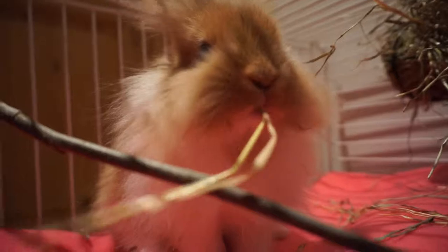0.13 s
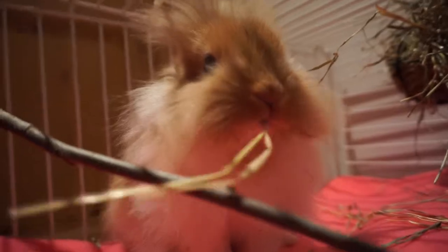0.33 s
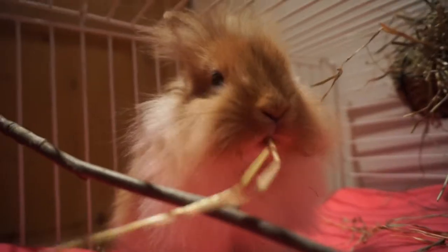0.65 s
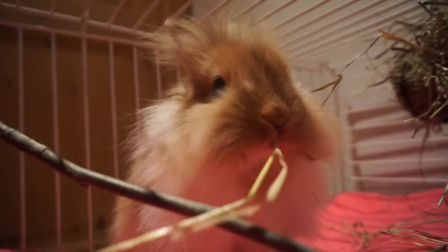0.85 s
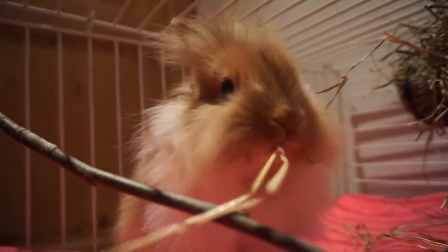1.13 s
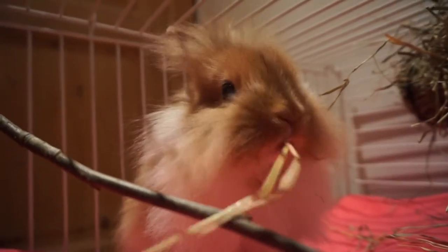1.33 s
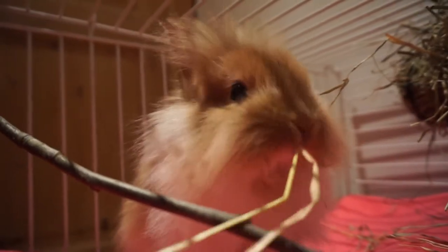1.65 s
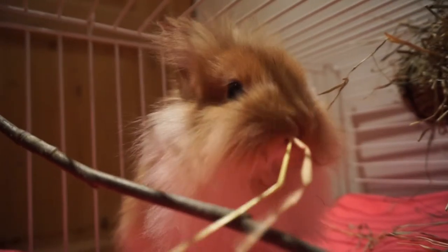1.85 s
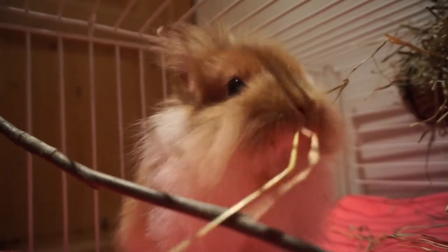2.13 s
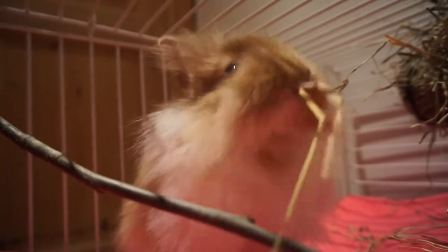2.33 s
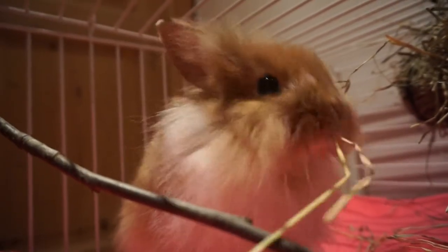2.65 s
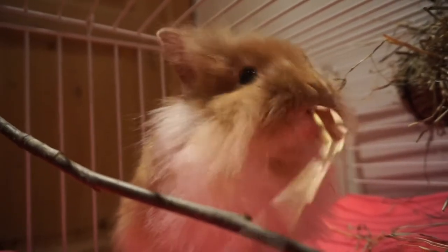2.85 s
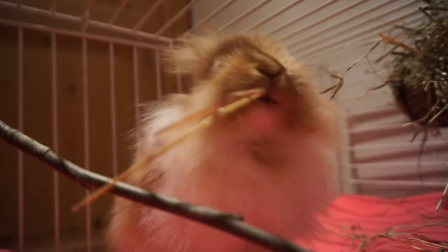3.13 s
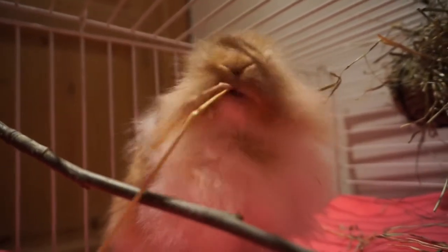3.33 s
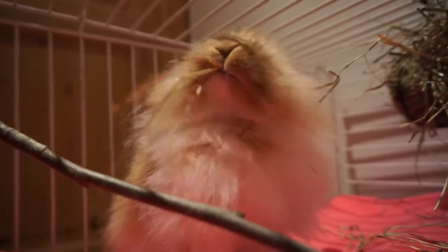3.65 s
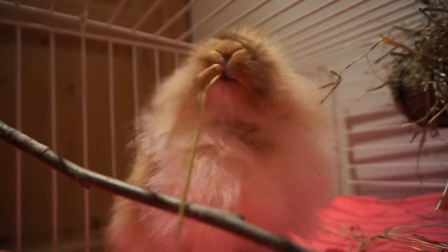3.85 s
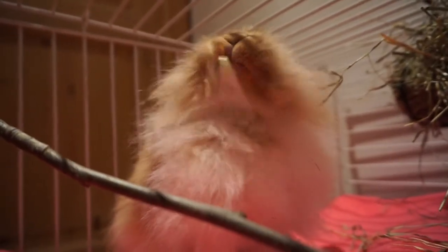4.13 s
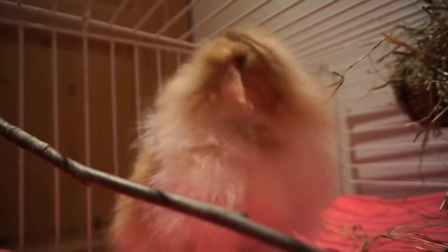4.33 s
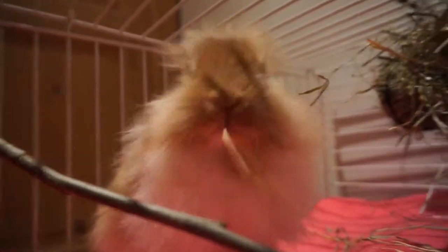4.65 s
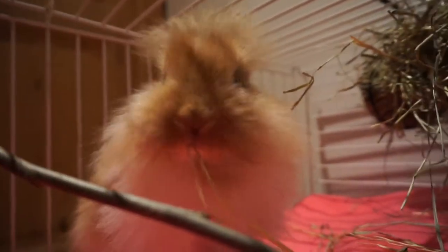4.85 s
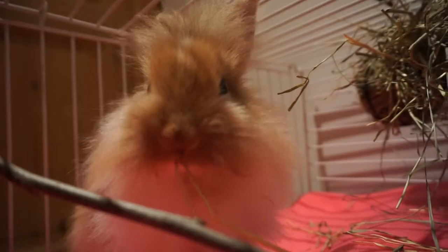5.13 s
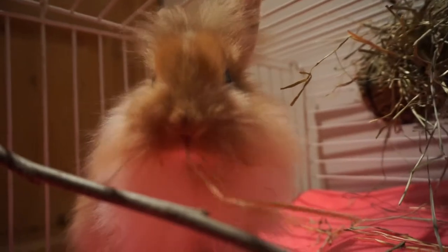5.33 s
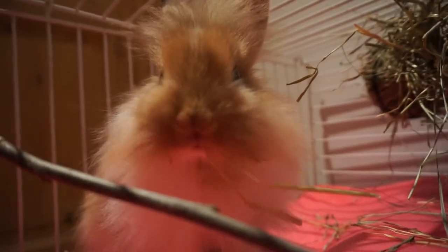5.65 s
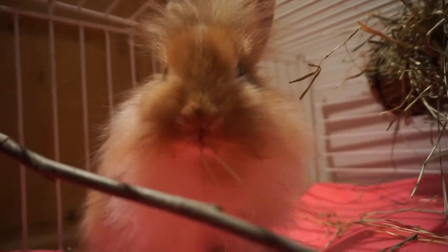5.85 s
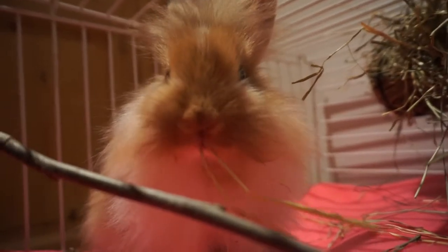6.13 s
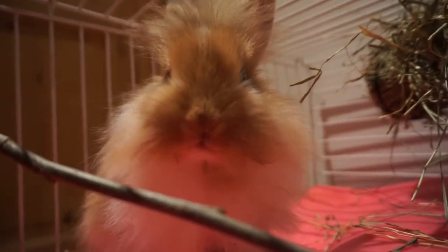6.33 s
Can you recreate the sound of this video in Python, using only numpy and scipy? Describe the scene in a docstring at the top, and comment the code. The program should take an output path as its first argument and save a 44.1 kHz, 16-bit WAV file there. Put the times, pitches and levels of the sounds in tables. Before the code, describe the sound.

A rabbit chews dry hay close by, with quick, crisp snaps and crunches over soft low thumps and faint room hiss.

```python
"""A small rabbit eating a dry stalk of hay in its cage, close to a hand-held stereo microphone.
Single fibres snap between its teeth, bundles tear in short crunches, each bite leaves crumbs ticking,
and the cage throws the cracks back. The stalk creaks as it is pulled in. Soft low thumps and scuffs
come about three times a second, then thin out. Behind it lies faint room hiss; the sound fades in."""
import sys
import numpy as np
from scipy import signal
from scipy.fft import rfft, irfft, next_fast_len
from scipy.io import wavfile
from scipy.ndimage import uniform_filter1d

SR = 44100
rng = np.random.default_rng(int(sys.argv[2]) if len(sys.argv) > 2 else 0)


def dump_mix(stems):
    """Bounce the given channels to the path in sys.argv[1] as a 16-bit WAV at rate SR."""
    frames = np.atleast_2d(stems).T  # one column per channel
    limited = np.clip(frames, -1, 1)  # hard clip at full scale
    pcm = np.round(limited * 32767).astype(np.int16)
    wavfile.write(sys.argv[1], SR, pcm)


N = 285887
TIME = np.arange(N) / SR

# Levels are relative. Spectrum of room and microphone hiss: f/Hz, level/dB
HISS_SPECTRUM = [(15, -37), (25, -11), (107, 0.5), (126, -8), (200, -8), (222, -11.5), (425, -12),
                 (461, -13), (791, -13), (905, -14), (1180, -15), (2200, -20), (2520, -20), (10300, -25),
                 (15800, -23.5)]
# stereo image of that hiss: f/Hz, left-right correlation
ROOM_IMAGE = [(60, 1), (130, 0.84), (290, 0.13), (640, -0.25), (1400, -0.34), (3100, -0.17), (15000, -0.11)]
# stereo image close to the microphone: f/Hz, left-right correlation
CLOSE_IMAGE = [(100, 1), (250, 0.96), (600, 0.93), (2000, 0.54), (15000, 0.93)]
# puffs of faint thin whistle: peak t/s, half width/s, level/dB
WHISTLE_PUFFS = [(1.66, 0.094, -56), (2.087, 0.022, -57.5), (3.55, 0.027, -57.5), (3.92, 0.04, -60.5),
                 (5.23, 0.024, -60.5), (5.534, .025, -56), (5.75, 0.059, -61), (5.903, 0.066, -57.5)]
# how busy the rabbit is; drives rustle, steady grinding and weak snaps: t/s, level/dB
ACTIVITY = [(0, -1.5), (1.3, 1.5), (2.6, 3.5), (3, -1), (4.3, -0.5), (5.3, -2), (6.2, -9), (6.48, -1.5)]
# spectrum of a dull brush: f/Hz, level/dB
BRUSH_SPECTRUM = [(100, -15), (220, -2), (380, 1.5), (650, -8.5), (1200, -9), (2200, -16), (4000, -23),
                  (9000, -24.5), (16000, -39)]
# spectrum of a papery rasp: f/Hz, level/dB
RASP_SPECTRUM = [(200, -14), (700, -14), (1200, -16), (1450, -6), (1650, 1), (2150, -2), (2600, -0.5),
                 (2950, 2), (3400, -1.5), (4200, -9.5), (8000, -46), (16000, -36)]
# something soft rubbing: t/s, fall/s, level/dB, factor on the rasp's frequencies
SCUFF_STROKES = [(.35, 0.16, -56.5, 0.97), (0.766, 0.025, -47, 0.99), (.828, 0.049, -55, .98),
                 (.893, 0.041, -48, 0.81), (1.541, .08, -52.5, .78), (1.66, 0.025, -46, 1.2),
                 (2.19, 0.08, -45, 0.69), (2.555, 0.071, -49, 1.2), (3.42, .07, -53, 1.12),
                 (4.38, 0.031, -46.5, 0.59), (4.7, .04, -58, 1.02), (5.025, .06, -52, 0.86),
                 (5.303, 0.016, -47, 1.05), (6.37, 0.16, -57.5, 1.15)]
# padded blows: t/s, fall/s, thud level/dB, thud f/Hz, knock level/dB, brush level/dB, sway level/dB
BLOWS = [(.405, 0.048, -35, 119, -52.5, -61, -29.5), (.56, 0.063, -39, 129.4, -59, -56.5, -64),
         (.891, 0.08, -39, 126, -60, -60.5, -44), (1.21, .059, -34.5, 116.4, -61, -51, -43),
         (1.54, 0.054, -32.5, 166, -50.5, -49, -38), (1.68, .045, -43.5, 131, -61, -59, -62),
         (1.848, 0.066, -36, 115.6, -52, -46.5, -39.5), (2.19, 0.072, -35.5, 130, -46.5, -50, -36),
         (2.52, 0.062, -42, 193, -58, -54, -62), (2.58, 0.058, -37.5, 122, -44, -48.5, -60),
         (3.145, 0.042, -46, 116, -43, -55, -56), (3.734, 0.043, -48.5, 92.5, -53, -63, -60),
         (4.28, .047, -39.5, 130, -70, -74, -64), (4.87, 0.15, -48.5, 130, -60, -61, -54),
         (5.298, 0.0074, -44, 610, -66, -50.5, -65)]
# boom under the heaviest blows: t/s, rise/s, fall/s, level/dB, f/Hz
BLOW_BOOMS = [(0.412, .05, 0.14, -24, 64.7), (1.559, 0.05, 0.042, -34.5, 90),
              (2.22, 0.026, 0.036, -34.5, 80.7), (2.556, 0.032, 0.056, -26.5, 76.3),
              (2.611, 0.022, 0.036, -34, 83.5)]
# time the cage takes to die away by 60 dB: f/Hz, decay/s
CAGE_DECAY = [(300, 0.69), (2000, 0.47), (8000, 0.41), (15000, 0.027)]
# the stalk creaking: t/s, fall/s, level/dB, factor on its resonances
STALK_CREAKS = [(.42, .04, -59, 1.03), (.768, 0.031, -48, 1.02), (.832, 0.036, -50, 0.97),
                (.875, .015, -55, 0.96), (.9, 0.022, -47.5, 0.98), (3.4, .06, -55, 1.02),
                (4.71, 0.029, -55.5, 0.98)]
# resonances of the creak: f/Hz, width/Hz, level/dB
CREAK_MODES = [(1645, 80, 0.5), (2820, 170, -0.5)]
# spectrum of chewed fibres ticking: f/Hz, level/dB
TICK_SPECTRUM = [(500, -16), (2500, -5.5), (5500, -15), (10000, -6), (12500, -11), (14300, -8), (16000, -1)]
# sizzle of the stalk sliding between the teeth: t/s, level/dB
SIZZLE_LEVEL = [(0, -77), (3, -78), (3.4, -58), (3.9, -65), (4.1, -55.5), (4.6, -54), (4.75, -68),
                (5.7, -64), (6.48, -70)]
# resonances of stalk and mouth: f/Hz, width/Hz, level/dB
MOUTH_MODES = [(1800, 190, -7), (2640, 750, -0.5), (6400, 560, -11), (9300, 2100, -6)]
# snaps gain sheen as the rabbit lifts its mouth toward the microphone: t/s, level/dB near 14 kHz
SNAP_SHEEN = [(1.3, 1), (1.7, -1.5), (2.4, -0.5), (3.2, 4), (3.7, -1.5), (4.3, 1), (5.2, 1), (5.9, 6.5)]
# bundles of fibres tearing: peak t/s, half width/s, level/dB, woody part/dB
BUNDLE_TEARS = [(.508, 0.0039, -48, 0), (1.663, 0.01, -45, 0), (2.397, 0.0062, -33.5, -7.5),
                (3.134, 0.0083, -39, -3), (3.222, 0.0053, -45.5, -3), (3.358, 0.0083, -46.5, -1),
                (3.452, 0.0089, -31, -10.5), (3.503, 0.0094, -37, -5.5), (3.709, 0.0065, -37.5, -17),
                (3.737, 0.0066, -36.5, -6.5), (3.76, 0.0055, -32, -12.5), (3.98, 0.0081, -32, -11),
                (4.024, 0.0085, -40, -20), (4.087, 0.0085, -41, -29), (4.534, 0.0082, -49.5, -10),
                (5.387, .005, -50, -14), (5.564, .005, -45, -12), (5.586, 0.0055, -45, -8),
                (5.911, 0.0034, -43, -28)]
# strong fibres breaking: t/s, treble level/dB, 7 kHz part/dB, woody part/dB, left over right/dB
STRONG_SNAPS = [(0.2982, -23.5, -9, 8, -4), (0.3227, -25, -6, 1, -8), (0.509, -14, -3.5, -5, 0),
                (0.5546, -19.5, -6, 7, -6), (0.5624, -23, -3, 9.5, -1), (0.7811, -34, -12, 24, -4),
                (0.8003, -24.5, -16, 16, -7), (0.9964, -23.5, -4, 7.5, -5), (1.0003, -24.5, -2, 7.5, 5),
                (1.045, -24, 2.5, 11.5, -4), (1.177, -25, -8, 8, -6), (1.2123, -12.5, -5, -4, 1.5),
                (1.268, -29, -2, 11, -4), (1.383, -23.5, 4, -0.5, 4), (1.4077, -33, -5, 13.5, -6),
                (1.4762, -9, -17, 0, -2), (1.4816, -5.5, -7, -12.5, -2), (1.5166, -20, -1.5, -3, -3),
                (1.6424, -1.5, -0.5, -11, -1), (1.6493, -7.5, 2.5, -2.5, -5), (1.668, -27.5, -1, 14.5, -2),
                (1.6884, -12, 1.5, 7.5, -6), (1.7052, -8.5, -4, -6, 0.5), (1.8836, -21.5, 6, -3.5, 0),
                (2.119, -10, -3.5, -9, 0.5), (2.1511, -18, -19, 3.5, -3), (2.3265, 0.5, -10.5, -16.5, -2),
                (2.3304, -8.5, -7, -11, 5), (2.372, -9, -17, -12, -6), (2.3931, -11, -3, -14.5, 0),
                (2.437, -20.5, -2, -9, -6), (2.5216, -21, -4, -5, -2), (2.5552, -7, -3.5, -5.5, -2),
                (2.7607, -26.5, -4, 2, 0), (2.9058, -29, 3.5, 5.5, -9), (2.9593, -18.5, 0, -6.5, -5),
                (3.055, -29.5, -7, 9, -8), (3.1357, -14, 3, -7, -8), (3.143, -13.5, -12, -3, 2),
                (3.2131, -20.5, -5, -3, 6), (3.2684, -15.5, -6, 2, -2), (3.4545, -11.5, -3, 0, 4),
                (3.4692, -19, -6, -8, -7), (3.5668, -20, -11, -2, 2), (3.673, -21, -8, -11, 9),
                (3.6947, -2, -9, -14.5, 3), (3.957, -11.5, -4.5, -6.5, -2), (3.963, -8, -9, -29, 3),
                (4.0509, -14, -20, -29, -1), (4.1566, -23, -2, -4, -2), (4.1821, -6, -7, -9, -5),
                (4.198, -20, -5, 5, -1), (4.3378, -6.5, -5.5, -13.5, -3), (4.3917, -33, -9, 21.5, -12),
                (4.4069, -21.5, -13, 9, -6), (4.6167, -12.5, -12, -1.5, -2), (4.6302, -22, -12, 4, -3),
                (4.8437, -20.5, -1, 9.5, -1), (4.8499, -14.5, -17, 3, 1), (5.0742, -25.5, -27, 14, -4),
                (5.091, -17, -8, 6, 2), (5.1409, -11, -15, -28, 4), (5.3005, -17.5, -10, -11, -5),
                (5.354, -16.5, -7, -14, 1), (5.5627, -11, -13, -24, 3), (5.5823, -16, -4, -8, -2),
                (5.9154, -14.5, -33.5, -33, -1), (5.9443, -19, -21, -24, 4), (5.9479, -9, -20, -40, 1),
                (6.0102, -22, -13, -24, -3)]


def amp(db):
    """Decibels to gain."""
    return 10 ** (np.asarray(db) / 20)


def unit(x):
    """Scales to rms 1."""
    return x / np.sqrt(np.mean(x ** 2) + 1e-20)


def read(points, hz):
    """Joins (f/Hz, value) points on a log-frequency axis."""
    f, value = np.transpose(points)
    return np.interp(np.log(hz + 1), np.log(f + 1), value)


def curve(rows):
    """Gain over time from (t/s, level/dB) rows."""
    return amp(np.interp(TIME, *np.transpose(rows)))


def add(mix, s, sound):
    """Mixes a stereo sound in at time s."""
    part = mix[:, max(round(s * SR), 0):][:, :sound.shape[1]]
    part += sound[:, :part.shape[1]]


def colour(x, points, size=1024):
    """Causal filter with the given (f/Hz, level/dB) shape."""
    log_gain = np.log(amp(read(points, abs(np.fft.fftfreq(size, 1 / SR)))))
    taps = np.fft.ifft(np.exp(np.conj(signal.hilbert(log_gain)))).real[:size // 2]
    return signal.fftconvolve(x, taps[None], axes=1)[:, :x.shape[1]]


def resonate(x, hz, q):
    """Rings one resonance."""
    return signal.lfilter(*signal.iirpeak(hz, q, SR), x)


def noise(shape_db, size, image=CLOSE_IMAGE):
    """Stereo noise of rms 1 with the spectrum shape_db(Hz), partly alike in both channels."""
    hz = np.fft.rfftfreq(size, 1 / SR)
    left, other = rfft(rng.standard_normal((2, size)))
    same = np.clip(read(image, hz), -1, 1)
    right = same * left + np.sqrt(1 - same ** 2) * other
    return unit(irfft(np.array([left, right]) * amp(shape_db(hz)), size))


def band(centre_hz, width_hz):
    """Shape in dB of a resonance passed twice."""
    return lambda hz: -20 * np.log10(1 + ((hz - centre_hz) / width_hz) ** 2)


def swell(rise, fall, size=32768):
    """Smooth rise, then exponential fall."""
    t = TIME[:size]
    return np.sin(np.pi / 2 * np.minimum(t / rise, 1)) ** 2 * np.exp(-np.maximum(t - rise, 0) / fall)


def burst(x, envelope):
    """Noise under an envelope, holding just the envelope's energy."""
    return unit(x * envelope) * np.sqrt(np.mean(envelope ** 2))


def flutter(size, spread_db, window):
    """Gain that wanders at random, smoothed over a window of samples."""
    return amp(spread_db * unit(uniform_filter1d(rng.standard_normal(size), size=window)))


def crackle(size, per_s, spread_db, width):
    """Tiny fractures of very uneven strength; width sets how unlike the two channels are."""
    strength = amp(spread_db * np.minimum(rng.exponential(1, size), 3.5))
    breaks = rng.random(size) < per_s / SR
    return strength * breaks * (rng.choice([-1, 1], size) + width * rng.standard_normal((2, size)))


def background(hiss_db=-53, hum_db=-63, hum_hz=100, whistle_hz=990):
    """The room behind the cage: steady hiss and rumble, a low hum, puffs of faint wavering whistle."""
    size = next_fast_len(N)
    hiss = noise(lambda hz: read(HISS_SPECTRUM, hz), size, ROOM_IMAGE)[:, :N]
    hum = np.sin(2 * np.pi * hum_hz * TIME)
    whistle = noise(band(whistle_hz, width_hz=55), size)[:, :N]
    puffs = sum(amp(db - 2) / (1 + ((TIME - s) / half) ** 2) for s, half, db in WHISTLE_PUFFS)
    return amp(hiss_db) * hiss + amp(hum_db) * hum + puffs * whistle


def dull_brush(size):
    """The noise of soft rubbing, heard close."""
    return noise(lambda hz: read(BRUSH_SPECTRUM, hz), size)


def rustle(brush_db=-64, rumble_db=-58):
    """Fur and bedding shifting under the busy animal: a lumpy dull brush over a low rumble."""
    size = next_fast_len(N)
    lumps = flutter(N, spread_db=3, window=3000)
    brush = amp(brush_db) * dull_brush(size)
    rumble = amp(rumble_db) * noise(band(centre_hz=70, width_hz=90), size)
    return curve(ACTIVITY) * lumps * (brush + rumble)[:, :N]


def scuffs(rasp_db=-1, brush_db=-8):
    """Rubbing that catches and slips: a papery rasp, a little to the left, over a dull brush."""
    out, lean_left = np.zeros((2, N)), amp([[1], [-1]])
    for s, fall, db, shift in SCUFF_STROKES:
        stroke = swell(0.47 * fall, fall)
        catches = flutter(len(stroke), spread_db=2.5, window=130)
        papery = noise(lambda hz: read(RASP_SPECTRUM, hz / shift), len(stroke))
        rasp = burst(papery * catches, stroke)
        brush = burst(dull_brush(len(stroke)), stroke)
        add(out, s, amp(db + rasp_db) * rasp * lean_left + amp(db + brush_db) * brush)
    return out


def thumps(knock_hz=293, knock_lag_s=0.01197, sway_hz=37.3, size=32768):
    """Padded blows: a low thud with a hollow knock, a dull brush and a deep sway; heavy ones boom."""
    out, t = np.zeros((2, N)), TIME[None, :size]
    sway = swell(rise=0.041, fall=0.13) * np.sin(2 * np.pi * sway_hz * t)
    for s, fall, thud_db, hz, knock_db, brush_db, sway_db in BLOWS:
        push = swell(0.53 * fall, fall)
        thud = burst(noise(band(hz, width_hz=0.29 * hz), size), push)
        knock = burst(noise(band(knock_hz, width_hz=63), size), push)
        brush = burst(dull_brush(size), push)
        add(out, s, amp(thud_db) * thud + amp(brush_db) * brush + amp(sway_db) * sway)
        add(out, s + knock_lag_s, amp(knock_db) * knock)
    for s, rise, fall, db, hz in BLOW_BOOMS:
        add(out, s, amp(db) * swell(rise, fall) * np.sin(2 * np.pi * hz * t))
    return out


def cage_echoes(x, early_db=-12, early_s=0.0059, tail_db=-12, size=16384, count=14):
    """A few quick echoes off the nearby walls and tray, then a short diffuse tail."""
    early = np.zeros((2, size))
    delay = .0015 + early_s * rng.exponential(1, (2, count)).clip(0, 5)
    strength = rng.choice([-1, 1], delay.shape) * np.exp(-delay / early_s / 2)
    np.put_along_axis(early, (delay * SR).astype(int), strength, 1)
    hz, t, spectra = signal.stft(rng.standard_normal((2, size)), SR, nperseg=256)
    decay = amp(-60 * t / read(CAGE_DECAY, hz)[:, None])
    tail = signal.istft(spectra * decay, SR, nperseg=256)[1][:, :size]
    tail *= np.minimum(TIME[:size] / 0.0064, 1)
    response = (amp(early_db) * unit(early) + amp(tail_db) * unit(tail)) / np.sqrt(size)
    return signal.fftconvolve(x, response, axes=1)[:, :N]


def creaks(size=8192):
    """Quick slips of the stalk against the teeth ring its two narrow resonances."""
    out = np.zeros((2, N))
    for s, fall, db, shift in STALK_CREAKS:
        slips = crackle(size, per_s=1200, spread_db=2.8, width=0.53)
        squeak = sum(amp(mode_db) * unit(resonate(slips, hz * shift, q=hz / width))
                     for hz, width, mode_db in CREAK_MODES)
        add(out, s, amp(db) * burst(squeak, swell(0.45 * fall, fall, size)))
    return out


def grinding(bites, steady_db=-59.5, crumb_db=-16, settle_s=0.055):
    """Chewed fibres tick faintly in the jaws; crumbs flare up after each bite and settle."""
    keep = np.exp(-1 / (settle_s * SR))
    recent_power = signal.lfilter([1 - keep], [1, -keep], np.mean(bites ** 2, axis=0))
    steady = amp(steady_db) * curve(ACTIVITY)
    level = np.sqrt(steady ** 2 + amp(crumb_db) ** 2 * recent_power)
    ticks = crackle(N, per_s=900, spread_db=4, width=1)
    return level * unit(colour(ticks, TICK_SPECTRUM))


def sizzle(hz=14300, width_hz=1300):
    """The stalk slides between the teeth with a thin, high crackle."""
    ticks = crackle(N, per_s=900, spread_db=4.2, width=1)
    return curve(SIZZLE_LEVEL) * unit(resonate(ticks, hz, q=hz / width_hz))


def mouth_ring(x):
    """Adds the short ring of stalk and mouth."""
    return x + sum(amp(db) * resonate(x, hz, q=hz / width) for hz, width, db in MOUTH_MODES)


def microphone_lag(x, lag_s=0.000016):
    """The right microphone port hears the mouth a moment after the left."""
    size = next_fast_len(N)
    turn = np.exp(-2j * np.pi * np.fft.rfftfreq(size, 1 / SR) * lag_s)
    return np.array([x[0], irfft(rfft(x[1], size) * turn, size)[:N]])


def crunches(size=8192):
    """A bundle gives way in a swelling shower of tiny fractures."""
    out, t = np.zeros((2, N)), TIME[:size] - size / 2 / SR
    for s, half, db, wood_db in BUNDLE_TEARS:
        stalk = [(200, wood_db + 7), (900, wood_db - 1), (1700, wood_db - 5.5), (3000, wood_db + 0.5),
                 (5500, wood_db / 2 - 10), (9500, -5.5), (12000, 3), (14000, 2.5), (17000, -3.5)]
        shower = colour(crackle(size, per_s=8000, spread_db=3.5, width=0.81), stalk)
        envelope = 1 / np.cosh(t / half * 1.25)
        add(out, s + t[0], amp(db) * burst(shower, envelope))
    return out


def weak_snap_rows(per_s=7, candidates=120):
    """Small fibres giving way at random moments, in the columns of STRONG_SNAPS."""
    when, chance = rng.random((candidates, 2)).T
    mean_db, spread_db = np.array([-28.5, -7, -4.5, -3]), np.array([3, 3, 5, 3])
    levels = mean_db + spread_db * rng.standard_normal((candidates, 4)).clip(-2, 2)
    rows = np.column_stack([when * TIME[-1], levels])
    rows[:, 1] += np.interp(rows[:, 0], *np.transpose(ACTIVITY))
    return rows[chance < per_s * TIME[-1] / candidates]


def snaps(rows, splinter_gain=1.85, splinter_s=0.00089, width=0.96, gain_db=1.5, size=512):
    """A fibre breaks by the microphone: a sharp click and brief splintering, coloured by the stalk."""
    out, t = np.zeros((2, N)), TIME[:size]
    for s, db, mid_db, wood_db, pan_db in rows:
        splinters = rng.standard_normal((3, size)) * np.exp(-t / splinter_s)  # shared, left, right
        crack = splinter_gain * unit(splinters[0] + width * splinters[1:]) / np.sqrt(size)
        crack[:, 2] += 1  # the click
        crack /= np.linalg.norm(crack, axis=1, keepdims=True)
        sheen_db = np.interp(s, *np.transpose(SNAP_SHEEN))
        stalk = [(150, wood_db - 2), (600, wood_db - 4), (1400, wood_db - 0.5), (2900, wood_db - 3),
                 (4600, (wood_db + mid_db) / 2 - 3), (7200, mid_db),
                 (10500, -2 - sheen_db / 2), (13500, 4 + sheen_db), (16000, 1.5 + sheen_db)]
        sides_db = np.array([[pan_db], [-pan_db]]) / 2
        add(out, s, colour(crack, stalk) * amp(db + gain_db + sides_db))
    return out


def scene():
    """Close chewing and its echoes in the cage, over thumps, scuffs, rustle and the quiet room."""
    surroundings = thumps() + scuffs() + background() + rustle()
    bites = microphone_lag(mouth_ring(snaps(STRONG_SNAPS) + crunches()))
    fine_crackle = grinding(bites) + sizzle()
    creaking = creaks()
    nibbles = microphone_lag(mouth_ring(snaps(weak_snap_rows())))
    chewing = bites + creaking + nibbles
    return chewing + cage_echoes(chewing) + fine_crackle + surroundings


def record(dry, top_hz=16050):
    """The microphone signal fades in quickly, holds at -4 dB and loses its highest treble."""
    fade_in = curve([(0, -55), (.1, -42), (.2, -30), (.27, -19), (.298, -4)])
    lowpass = signal.firwin(301, top_hz, window=("kaiser", 8), fs=SR)
    return signal.oaconvolve(dry * fade_in, lowpass[None], "same", axes=1)


dry = scene()
out = record(dry)
dump_mix(out)
```